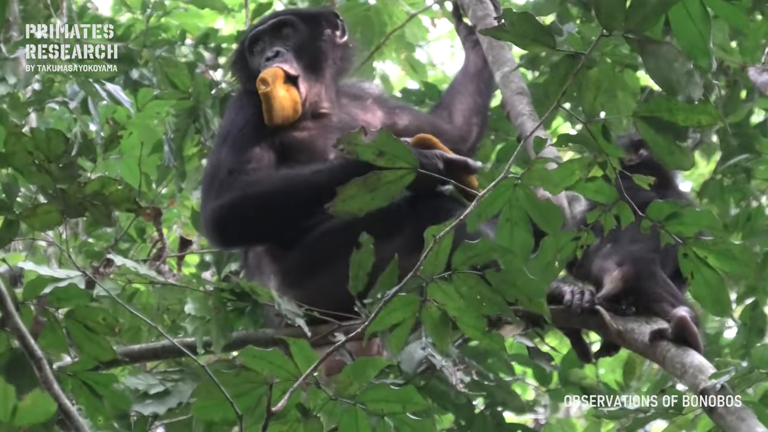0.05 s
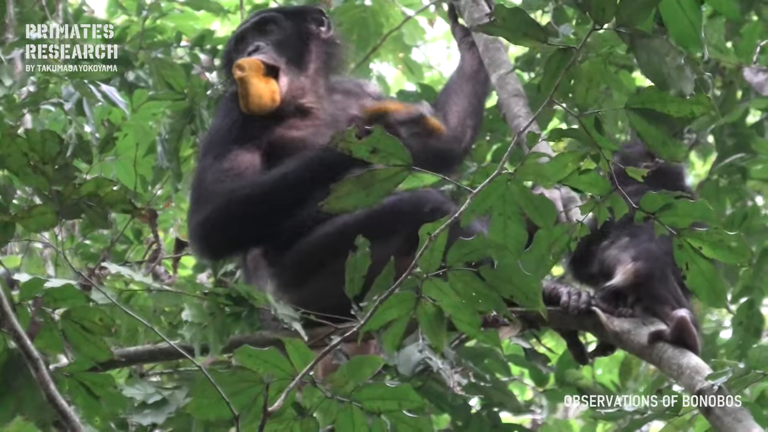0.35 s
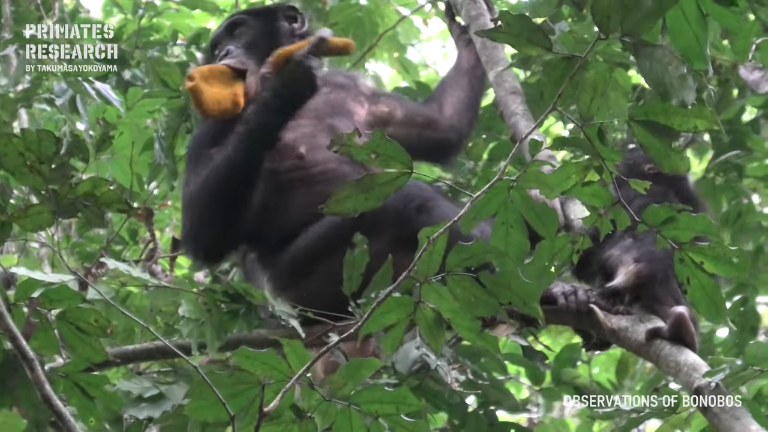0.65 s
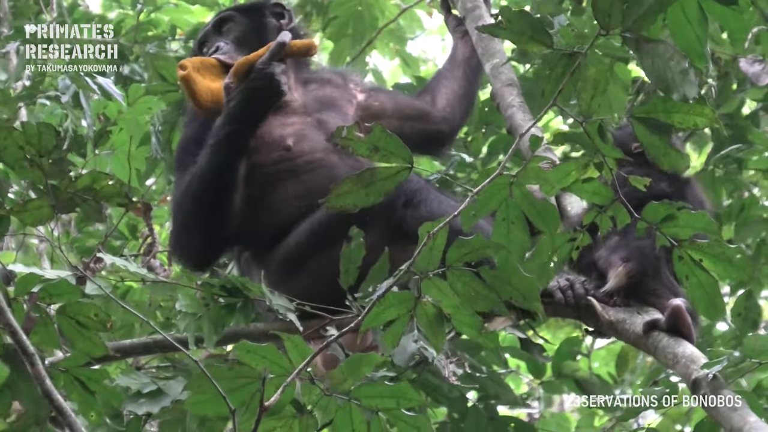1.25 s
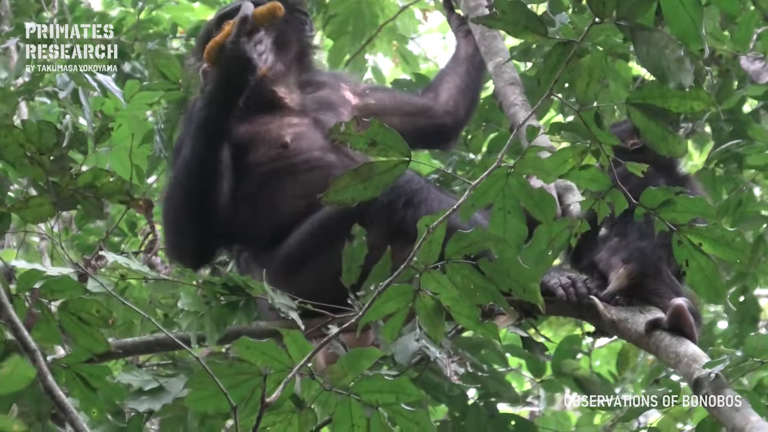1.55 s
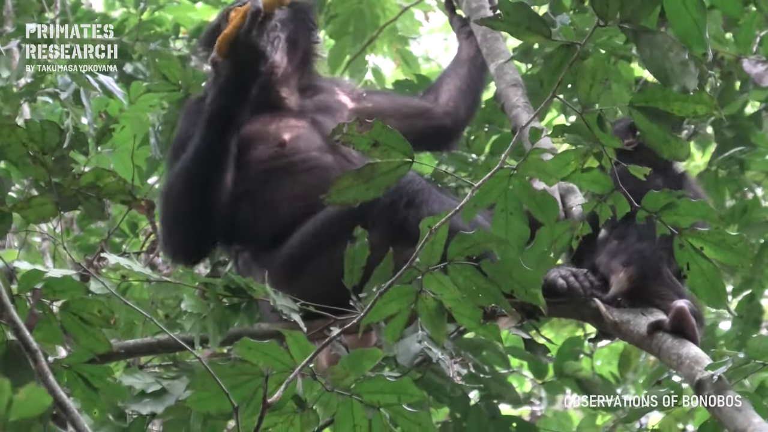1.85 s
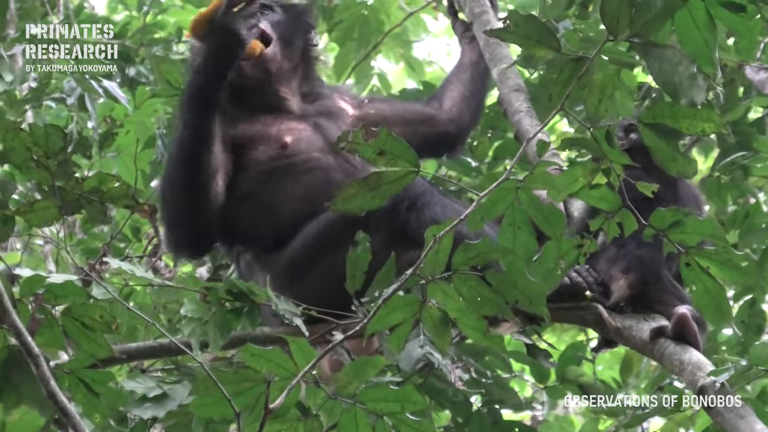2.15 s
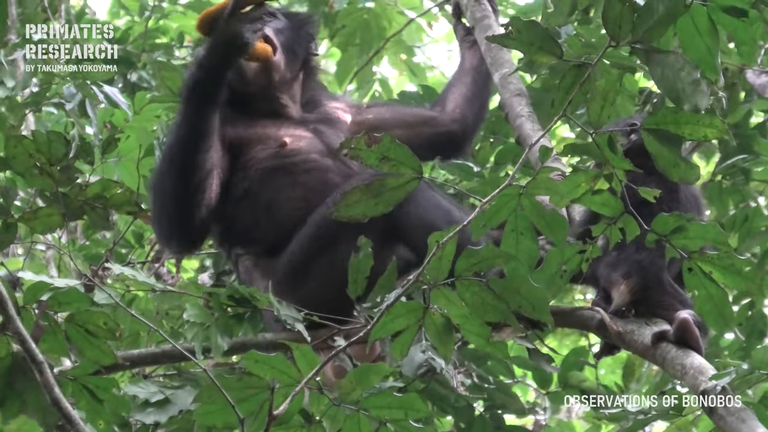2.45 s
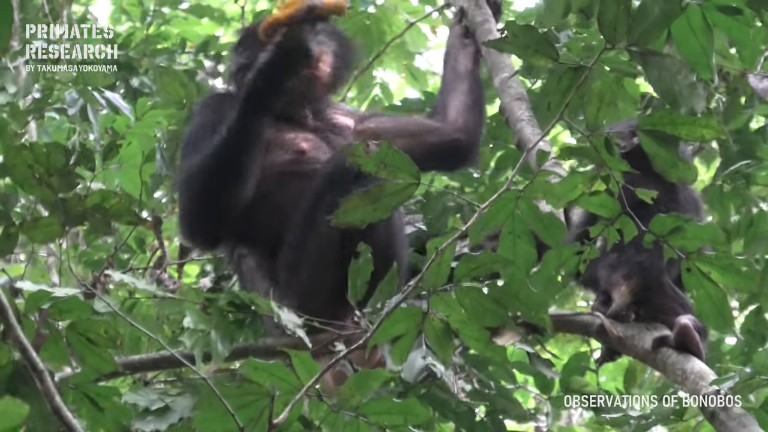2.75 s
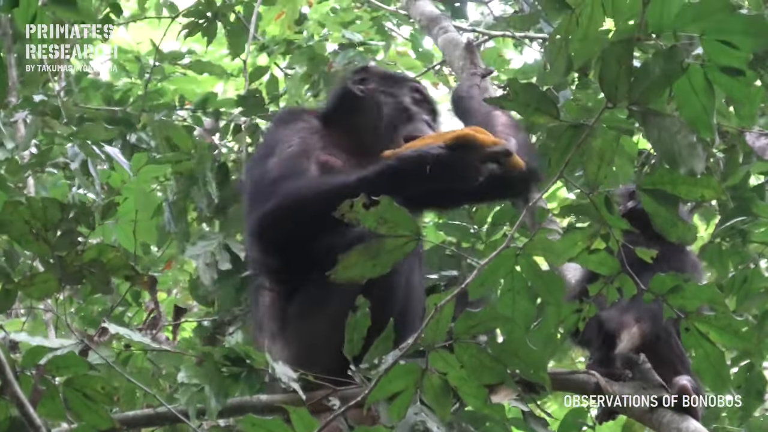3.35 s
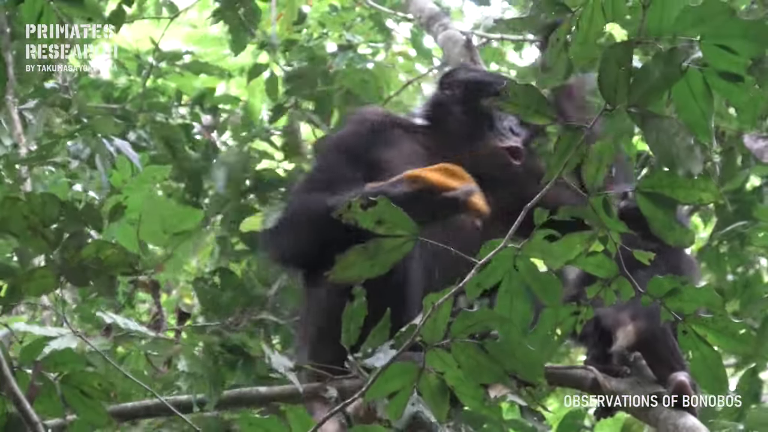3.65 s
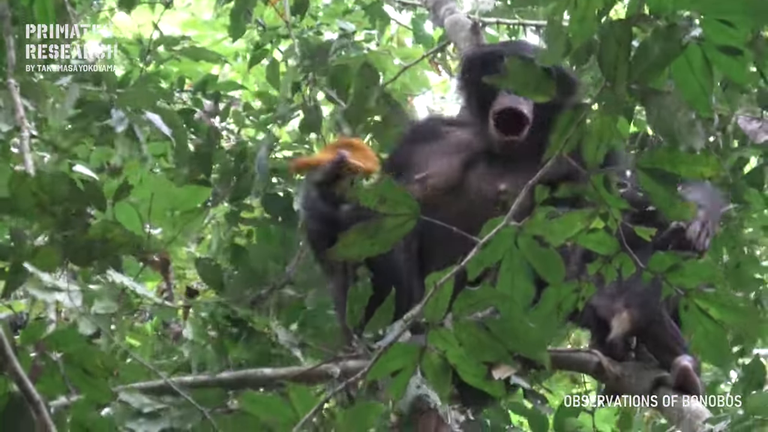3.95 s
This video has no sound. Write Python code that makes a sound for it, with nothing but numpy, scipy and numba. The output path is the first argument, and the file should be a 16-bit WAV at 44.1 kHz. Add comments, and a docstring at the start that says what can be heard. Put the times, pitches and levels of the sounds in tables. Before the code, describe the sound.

Bonobos give high cries that leap from a hoot to a whistle and fall back: a short one at 0.3 seconds, a longer one from 1.4 to 2, then another. From 2.2 seconds rough yelps overlap further cries until the end, with rasping screams on the right at 2.6 and 3.6. The calls echo lightly among trees over steady, shrill insects and quiet forest air.

```python
"""Arched bonobo cries leap from a low hoot to a whistle, over a shrill insect chorus and quiet forest air.
Rough yelps overlap them, with two long screams from the right and faint calls further off.
Each call is the harmonics of vibrating vocal folds, shaken by roughness and shaped by the throat.
Branches and trunks scatter the calls; a limiter ducks the whole forest whenever they get loud."""
import sys
import numpy as np
from scipy import signal
from scipy.fft import rfft, irfft
from scipy.io import wavfile
from scipy.ndimage import uniform_filter1d
from numba import njit

SR = 44100
rng = np.random.default_rng(int(sys.argv[2]) if len(sys.argv) > 2 else 0)


def wrap_up_sound(samples):
    """Save the sound to the file named by the first command line argument, as 16-bit audio."""
    columns = np.atleast_2d(samples).T
    # keep every value between -1 and 1, then stretch to whole-number steps
    tamed = np.clip(columns, -1, 1)
    steps = np.round(tamed * 32767).astype(np.int16)
    wavfile.write(sys.argv[1], SR, steps)


N = 176400
TIME_S = np.arange(N) / SR
TOP_HZ = 15700


def undb(db):
    return 10 ** (np.asarray(db) / 20)


def unit_rms(x):
    return x / np.sqrt(np.mean(x ** 2))


def curve_gain(hz, curve):
    """Gain of a (freq_hz, gain_db) curve at hz."""
    freq_hz, gain_db = np.array(curve).T
    return undb(np.interp(np.log(np.maximum(hz, 1)), np.log(freq_hz), gain_db))


def flutter(hz, size=N):
    """Unit-RMS random wavering, up to about hz."""
    freq_hz = np.arange(size // 2 + 1) * SR / size
    return unit_rms(irfft(rfft(rng.standard_normal(size)) / np.sqrt(1 + (freq_hz / hz) ** 4), size))


def pan(x, db):
    """Mono to stereo; db is left minus right."""
    return x * undb(np.array([np.atleast_1d(db), -np.atleast_1d(db)]) / 2)


def noise_bed(spectrum, width):
    """Coloured stereo noise."""
    colour = curve_gain(np.arange(N // 2 + 1) * SR / N, spectrum)
    mid, side = (unit_rms(irfft(rfft(rng.standard_normal(N)) * colour, N)) for _ in range(2))
    return mid + width * np.array([side, -side])


# freq_hz, gain_db
AIR_SPECTRUM = [(55, -6), (120, -0.5), (250, -3.5), (850, -5.5), (1400, -10.5), (4000, -15), (12000, -31)]

def forest_air(level_db=-64):
    """Quiet air among the leaves, drifting in level."""
    return undb(level_db) * noise_bed(AIR_SPECTRUM, width=0.92) * undb(flutter(0.43))


# freq_hz, gain_db
RUMBLE_SPECTRUM = [(25, -23), (55, 1.5), (190, 6), (300, -9), (1500, -54)]
# start_s, level_db
RUMBLE_ENVELOPE = [(1.02, -89), (1.119, -68), (1.3, -65.5), (1.45, -67), (1.55, -99)]

def rumble():
    """One brief swell of low noise."""
    level_db = np.interp(TIME_S, *np.array(RUMBLE_ENVELOPE).T)
    return undb(level_db) * noise_bed(RUMBLE_SPECTRUM, width=0.2)


# pitch_hz, level_db
INSECT_TONES = [(4748, -59.5), (4846, -54)]
# freq_hz, gain_db
CHORUS_SPECTRUM = [(2800, -66), (3650, -24), (3950, -4), (4400, 3), (5000, 1.5), (5170, 4.5), (5450, 1.5),
                   (5850, -2), (9500, -10.5), (11000, -20.5), (15500, -32)]

def insects(throb_hz=31, throb_depth=0.047, buzz_db=-52, chorus_db=-53):
    """Two wavering tones and a narrow buzz throb in the hiss of the whole chorus."""
    sine = lambda hz: np.sin(2 * np.pi * np.cumsum(hz) / SR)
    tones = sum(undb(db) * np.sqrt(2) * sine(hz + 5 * flutter(17.2)) for hz, db in INSECT_TONES)
    throb = 1 + throb_depth * sine(throb_hz * (1 + 0.061 * flutter(3.1)))
    buzz = noise_bed([(4500, -73), (4720, -12), (4830, 1), (4900, -1), (5000, -82)], width=0.47)
    song = (tones + undb(buzz_db) * buzz) * throb * undb(0.86 * flutter(9.7))
    chorus = undb(chorus_db) * noise_bed(CHORUS_SPECTRUM, width=0.08) * undb(0.5 * flutter(45))
    return song + chorus


def trees(x, branch_decay_s=0.017, trunk_t60_s=0.93, correlation=0.56):
    """Quick scatter from nearby branches, then a long tail from the trunks."""
    t = np.arange(SR) / SR
    spectrum = [(200, 2.5), (600, -4.5), (1100, -1), (1900, 1.5), (4000, 5.5), (8000, -2), (15000, 8)]
    colour = curve_gain(np.arange(SR // 2 + 1), spectrum)
    unit_energy = lambda e: e / np.sqrt(np.sum(e ** 2))
    branches = undb(-4) * unit_energy(np.exp(-t / branch_decay_s) * (t > 0.003))
    trunks = undb(-9) * unit_energy(undb(-60 * t / trunk_t60_s) * np.minimum(t / 0.042, 1))
    mid, side = irfft(rfft(rng.standard_normal((2, SR)) * np.hypot(branches, trunks)) * colour, SR)
    echo = np.sqrt((1 + correlation) / 2) * mid + np.sqrt((1 - correlation) / 2) * np.array([side, -side])
    return x + signal.fftconvolve(x, echo, axes=1)[:, :N]


LEAP_S, LEAP_RATIO = 0.012, 1.75

def leaping_pitch(t, start_s, hz):
    """Pitch glides between points, but breaks quickly between the low and high registers."""
    i = np.clip(np.searchsorted(start_s, t) - 1, 0, len(start_s) - 2)
    stepped = np.where(t < (start_s[i] + start_s[i + 1]) / 2, hz[i], hz[i + 1])
    leaps = np.abs(np.log(hz[i + 1] / hz[i])) > np.log(LEAP_RATIO)
    return uniform_filter1d(np.where(leaps, stepped, np.interp(t, start_s, hz)), int(LEAP_S * SR))


def voice(call, throat, rolloff_db_per_oct, jitter, jitter_hz, shimmer, shimmer_hz, rasp_db,
          overtone_pan_db, base_pan_db=(-1.85, 2.5), attack_s=0.0052, release_s=0.011):
    """Vocal-fold harmonics; roughness adds pitch jitter, level shimmer, rasp and period doubling."""
    start_s, pitch_hz, *controls = np.array(call).T
    end_s = start_s[-1] + release_s
    first, last = int(start_s[0] * SR), min(N, int(end_s * SR))
    t, size = np.arange(first, last) / SR, last - first
    level_db, overtones_db, roughness = (np.interp(t, start_s, c) for c in controls)
    hz = leaping_pitch(t, start_s, pitch_hz) * (1 + 0.0038 * flutter(28.5, size))
    phase = 2 * np.pi * np.cumsum(hz * (1 + jitter * roughness * flutter(jitter_hz, size))) / SR
    fall_oct_per_s = np.clip(-np.gradient(np.interp(t, start_s, np.log2(pitch_hz)), t), 0, 10.5)
    fall_oct_per_s = uniform_filter1d(fall_oct_per_s, int(LEAP_S * SR))
    # strong overtones and falling pitch both brighten the voice
    slope_db_per_oct = rolloff_db_per_oct + 0.54 * overtones_db + 0.4 * fall_oct_per_s
    overtones = np.zeros(size)
    for k in range(2, 10):
        gain = curve_gain(k * hz, throat) * undb(slope_db_per_oct * np.log2(k / 2)) * (k * hz < TOP_HZ)
        overtones += gain * np.sin(k * phase + rng.uniform(0, 2 * np.pi))
    fundamental = pan(np.sin(phase), np.interp(hz, (700, 1700), base_pan_db))
    tone = fundamental + pan(overtones * undb(overtones_db), overtone_pan_db)
    tremble = shimmer * flutter(shimmer_hz, size)
    rasp = undb(rasp_db) * flutter(790, size)
    doubling = undb(-9.5) * np.sin(phase / 2)
    shake = (1 + roughness * (tremble + rasp + doubling)) * np.sqrt(2 / (1 + (roughness * shimmer) ** 2))
    gate = np.clip((t - t[0]) / attack_s, 0, 1) * np.clip((end_s - t) / release_s, 0, 1)
    out = np.zeros((2, N))
    out[:, first:last] = tone * shake * gate * undb(level_db)
    return out


# throat of far calls and cries: freq_hz, gain_db
CRY_FORMANTS = [(500, 21), (1200, -5.5), (1900, 4.5), (2450, -4.5), (3200, 5), (4000, -7), (4900, 0.5),
                (6000, 3.5), (8000, 4), (10000, 1.5), (12000, -11), (14200, -19), (16000, -16)]
# per call: start_s, pitch_hz, level_db, overtones_db, roughness
FAR_CONTOURS = [
    [(.15, 872, -74, -29, 0.4), (.2, 896, -62, -30, 0.27), (.23, 876, -67, -22, 0.36)],
    [(3.61, 426, -51.5, -20, 0.54), (3.68, 419.5, -52, -15, 0.34), (3.74, 367, -48.5, -14, 0.39)],
]

def far_calls():
    """Faint, dull calls from further off."""
    return sum(voice(call, CRY_FORMANTS, rolloff_db_per_oct=-19, jitter=0.087, jitter_hz=100,
                     shimmer=0.58, shimmer_hz=80, rasp_db=2.5, overtone_pan_db=3, base_pan_db=(3, 3))
               for call in FAR_CONTOURS)


# freq_hz, gain_db
SCREAM_FORMANTS = [(2000, -1), (3400, 3), (4050, -1), (4500, 0.5), (4720, -6), (5300, -1), (6100, -3.5),
                   (7200, 0.5), (9500, -5.5), (11800, -15), (14000, -20.5), (16000, -45)]
# per scream: start_s, pitch_hz, level_db, overtones_db, roughness
SCREAM_CONTOURS = [
    [(2.565, 1348, -51.5, -22, 0.21), (2.605, 1761, -45, 2, 0.056), (2.665, 2036, -57, 15.5, .07),
     (2.783, 2006, -64.5, 20, 0.11), (2.797, 2348, -52.5, 14.5, 0.98), (2.835, 2254, -57.5, 14.5, 1),
     (2.89, 2312, -51.5, 10.5, 0.92), (2.935, 2194, -53, 10.5, 0.57), (3.01, 2247, -59.5, 13.5, 0.94),
     (3.07, 2305, -48, 8.5, 0.51), (3.16, 2311, -46, 6, 0.29), (3.196, 1778, -49, -4, 0.81),
     (3.202, 1050, -29, -34, 0.17)],
    [(3.615, 1436, -49, -14, 0.54), (3.65, 2160, -49, 3, 0.44), (3.68, 2295, -52, 7, 0.45),
     (3.74, 2347, -51, 7, 0.37), (3.785, 2334, -49, 8.5, 0.27), (3.8, 2642, -51, 7.5, .75),
     (4, 2480, -50.5, 6, 0.84)],
]

def screams():
    """High, rasping screams from the right, strong in overtones."""
    return sum(voice(call, SCREAM_FORMANTS, rolloff_db_per_oct=-7, jitter=0.043, jitter_hz=280,
                     shimmer=0.5, shimmer_hz=120, rasp_db=-7.5,
                     overtone_pan_db=-2.5, base_pan_db=(-11, -11))
               for call in SCREAM_CONTOURS)


# freq_hz, gain_db
YELP_FORMANTS = [(500, 2), (1150, 1.5), (1500, -8.5), (2400, -11.5), (3200, 0.5), (4000, -10), (14000, -18)]
# per yelp: start_s, pitch_hz, level_db, overtones_db, roughness
YELP_CONTOURS = [
    [(2.24, 2010, -37, -24, 0.22), (2.268, 1616, -42, -10, 0.38), (2.28, 977, -38.5, -4.5, 0.92),
     (2.31, 876.6, -31.5, -13, 0.39), (2.345, 810.4, -33, -11, 0.74), (2.378, 500, -39.5, -6, 0.43),
     (2.396, 491.8, -27.5, -18, 0.18), (2.424, 495, -26, -17, 0.1), (2.44, 556.3, -34, -5, 0.66),
     (2.477, 764, -27.5, -9, 0.51), (2.5, 891.5, -24.5, -13, 0.55), (2.523, 1272, -35, -17, 0.4),
     (2.543, 1087, -30, -15, 0.6), (2.565, 528.7, -32, -11, 0.66), (2.63, 486, -34, -6, 0.63)],
    [(2.765, 447, -38.5, -11, 0.55), (2.8, 487.6, -30, -18, 0.76), (2.838, 509.3, -28, -7, 0.657),
     (2.875, 499.4, -29.5, -23, 0.494), (2.905, 580, -40, -2, 0.85), (2.928, 756, -31.5, -10, 0.594),
     (2.955, 900, -30.5, -7, 0.61), (2.985, 511.2, -34.5, -3.5, 0.85), (3.025, 493.4, -28.5, -7, 0.42),
     (3.055, 458, -43.5, 3.5, 1)],
    [(3.19, 494, -33.5, -20, 0.47), (3.24, 477.5, -35, -5, 0.73), (3.335, 505, -37.5, -13.5, 0.59)],
    [(3.4, 477.6, -35.5, -10, 0.37), (3.447, 487, -33.5, -12, 0.52), (3.475, 663, -38.5, -2, 0.85),
     (3.497, 857, -29, -14, 0.5), (3.523, 1439, -38.5, -9, 0.25), (3.555, 1696, -38, -21, 0.15),
     (3.583, 1612, -36.5, -26, 0.3), (3.604, 1087, -32.5, -15, 0.61), (3.62, 1555, -44, -11, 0.22)],
    [(3.752, 487.4, -35, -16, 0.57), (3.8, 471.2, -40.5, -7.5, 0.59), (3.835, 660, -33.5, -3, 0.99),
     (3.864, 933, -28.5, -17, 0.66), (3.879, 1641, -38.5, -17, 0.51), (3.905, 1913, -29.5, -3.5, 0.14),
     (3.932, 2012, -28, -0.5, 0.025), (3.958, 1847, -37, -2, 0.2), (3.982, 1056, -42, -24, 0.35)],
]

def yelps(mouth_hz=1086, mouth_width_hz=39, mouth_db=-6.5):
    """Unsteady folds ring one narrow resonance of the rounded mouth."""
    calls = sum(voice(call, YELP_FORMANTS, rolloff_db_per_oct=-9, jitter=0.16, jitter_hz=110,
                      shimmer=0.55, shimmer_hz=85, rasp_db=-14.5, overtone_pan_db=3.5)
                for call in YELP_CONTOURS)
    mouth = signal.iirpeak(mouth_hz, mouth_hz / mouth_width_hz, fs=SR)
    return calls + undb(mouth_db) * signal.lfilter(*mouth, calls)


# per cry: start_s, pitch_hz, level_db, overtones_db, roughness
CRY_CONTOURS = [
    [(.273, 600, -39, -9, 0.03), (.287, 600, -33.5, -13.5, 0.09), (.31, 958, -46, -15, 0.23),
     (.335, 1421, -40, -15, 0.12), (.355, 1668, -46.5, -4, 0.05), (.372, 1783, -33, -23, 0),
     (.405, 1944, -36, -17, 0), (.445, 1824, -45, -5.5, 0.25), (.467, 1379, -42.5, -26, 0.04),
     (.489, 935, -30.5, -16, 0.09), (.515, 691, -49.5, -6, 0.33), (.56, 415, -59, -5, 0.5)],
    [(1.437, 483, -36, -29, 0.08), (1.455, 526.5, -35.5, -17.5, 0.04), (1.484, 615.6, -27, -18, 0),
     (1.5, 1100, -47, -24, 0.5), (1.524, 1541, -34.5, -7, 0.09), (1.58, 1958, -37, -9.5, 0.06),
     (1.62, 2008, -36, -8, 0.07), (1.655, 1946, -40, -4.5, 0), (1.674, 1883, -41.5, -5.5, .55),
     (1.71, 1758, -45, -8.5, 0.35), (1.8, 2017, -36, -3.5, 0.05), (1.88, 2008, -40.5, 1.5, 0.08),
     (1.96, 1937, -41, -2, 0.1), (1.982, 1592, -46, -5, 0.37), (1.997, 1109, -25.5, -25.5, 0.11),
     (2.016, 1001, -34.5, -15, 0.61), (2.05, 955, -36.5, -26, 0.42), (2.085, 790, -49, -26, 0.3)],
    [(2.052, 504, -37.5, -0.5, 0.03), (2.092, 701, -30, -20, 0.41), (2.113, 1312, -38, -6, 0.1),
     (2.155, 1805, -30.5, -18.5, 0), (2.2, 2014, -34, -7.5, 0.22), (2.24, 2136, -41.5, -6.5, 0.41),
     (2.29, 2119, -39.5, -8, 0.1)],
    [(2.918, 1452, -33, -12, 0.33), (2.955, 1670, -39.5, -22, 0.36), (3.045, 1870, -46, -4, 0.96)],
    [(3.33, 493.5, -42.5, 1.5, 0.08), (3.356, 648, -28, -17.5, 0.55), (3.382, 1462, -42, -8.5, 0.1),
     (3.403, 1637, -35, -14, 0.04), (3.416, 1503, -49.5, -2, 0.07), (3.43, 1016, -34, -10, 0.5)],
    [(3.91, 566, -37.5, -22, 0.25), (3.938, 624.5, -29, -25, 0), (3.952, 1430, -40, 3, 0.1),
     (3.975, 1830, -33.5, -8.5, 0), (4, 2030, -37, -4, 0.2)],
]

def cries():
    """Clear, arched cries: the folds leap from a hoot to a whistle."""
    return sum(voice(call, CRY_FORMANTS, rolloff_db_per_oct=-11, jitter=0.045, jitter_hz=145,
                     shimmer=1.0, shimmer_hz=135, rasp_db=-28, overtone_pan_db=0.5)
               for call in CRY_CONTOURS)


def scene(voice_low_hz=221):
    """Bonobos echo among the trees, over the forest background."""
    low_cut = signal.butter(4, voice_low_hz, "high", fs=SR, output="sos")
    bonobos = signal.sosfilt(low_cut, cries() + yelps() + screams() + far_calls())
    return trees(bonobos) + insects() + forest_air() + rumble()


@njit
def gain_reduction_db(excess_db, attack_s, recover_db_per_s):
    """Rises quickly to the excess, falls back at a steady rate."""
    out, cut_db = np.empty(len(excess_db)), 0.
    for i in range(len(excess_db)):
        if excess_db[i] > cut_db:
            cut_db += (excess_db[i] - cut_db) / (attack_s * SR)
        else:
            cut_db = max(cut_db - recover_db_per_s / SR, 0.)
        out[i] = cut_db
    return out


def record(dry, ceiling_db=-30.5):
    """Slow-recovering limiter, then a steep low-pass."""
    excess_db = 20 * np.log10(np.abs(dry).max(axis=0) + 1e-9) - ceiling_db
    limited = dry * undb(-gain_reduction_db(excess_db, attack_s=0.0022, recover_db_per_s=11))
    return signal.sosfilt(signal.ellip(10, 0.2, 80, TOP_HZ, fs=SR, output="sos"), limited)


dry = scene()
out = record(dry)
wrap_up_sound(out)
```